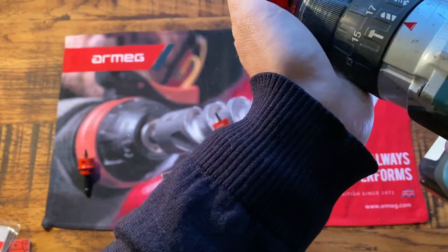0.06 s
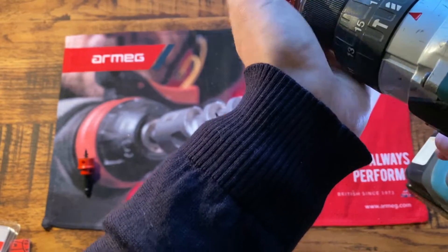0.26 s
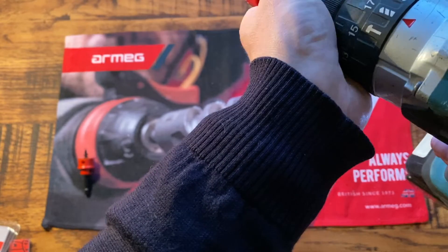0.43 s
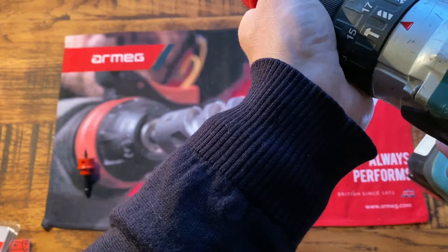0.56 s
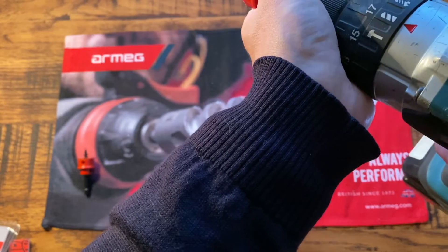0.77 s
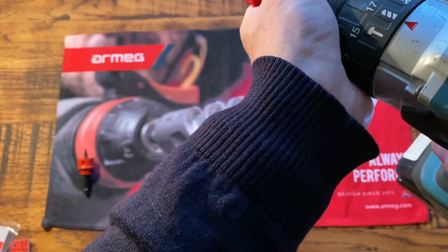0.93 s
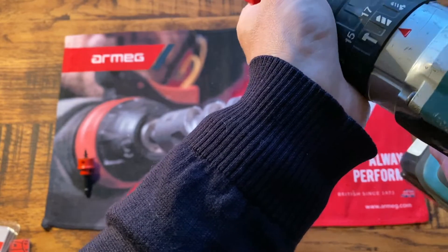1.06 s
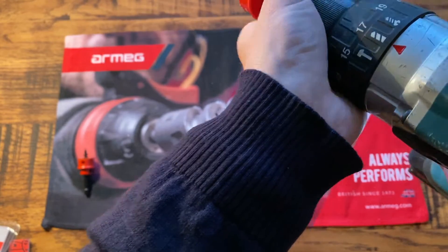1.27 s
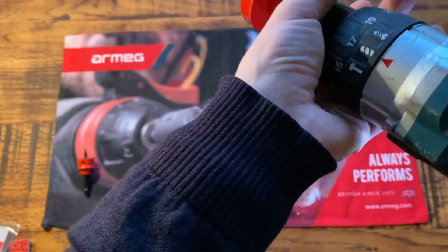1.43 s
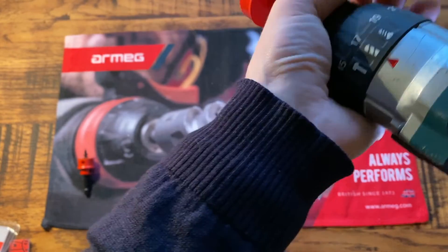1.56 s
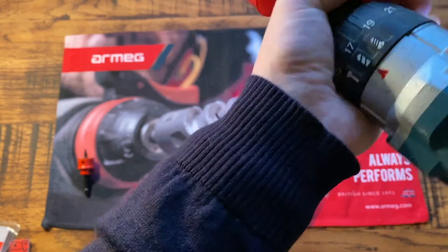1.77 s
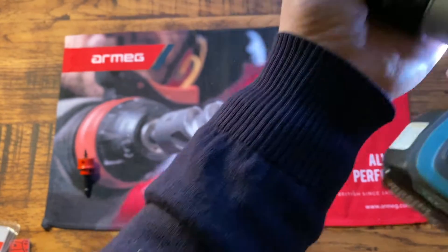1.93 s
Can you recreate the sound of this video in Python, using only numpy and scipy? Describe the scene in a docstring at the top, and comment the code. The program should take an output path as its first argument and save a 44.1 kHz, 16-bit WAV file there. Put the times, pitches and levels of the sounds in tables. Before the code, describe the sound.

A drill chuck is turned by hand, with clicks, brief whirrs and a sharp clack.

```python
"""A hand works the chuck of a cordless drill over a table in a small room, close to the microphone.
First, dull puffs of air buffet the microphone while the grip loosens and the chuck's lock ticks twice.
A short turn makes the gears whirr, sinking in pitch, and the plastic sleeve creaks. In a second turn
the chuck catches with a rattling double clack of steel jaws and housing. Last, the palm slides over
the sleeve with a soft rasp and one more tick."""
import sys
import numpy as np
from scipy import signal
from scipy.fft import rfft, irfft
from scipy.io import wavfile

SR = 44100
rng = np.random.default_rng(int(sys.argv[2]) if len(sys.argv) > 2 else 0)


def wrap_up_sound(samples):
    """Save the sound to the file named by the first command line argument, as 16-bit audio."""
    columns = np.atleast_2d(samples).T
    # keep every value between -1 and 1, then stretch to whole-number steps
    tamed = np.clip(columns, -1, 1)
    steps = np.round(tamed * 32767).astype(np.int16)
    wavfile.write(sys.argv[1], SR, steps)


N = 88200

# chuck hits: (time [s], steel tick [dB], body knock [dB], spot pitch [Hz], spot ring [dB])
CHUCK_HITS = [(0.3494, -8.5, -24.5, 7060, -15), (0.351, -15, -14, 804, -27), (0.375, -5, -17.5, 1900, -32),
              (0.377, -17.5, -29, 3640, -28), (0.882, -35.5, -39, 1940, -46.5),
              (0.9312, -24, -17, 2200, -33.5), (0.938, -20.5, -35, 7800, -44),
              (1.289, -39.5, -48, 1500, -43.5), (1.298, -57, -39.5, 1366, -51),
              (1.556, -29, -30, 2326, -45), (1.568, -34.5, -25, 1760, -36), (1.5866, -22, -36, 634, -33.5),
              (1.605, -42, -24, 434, -26), (1.634, -0.5, 1.5, 2600, -6), (1.636, -22, -2, 338.5, -30.5),
              (1.6385, -14, -2.5, 4240, -29), (1.6421, -7, -18, 8200, -2), (1.643, -5, -5, 1864, -6.5),
              (1.6459, -7, -21, 5350, -15), (1.6494, -20, -11, 3110, -9), (1.677, -15, -27, 2900, -21),
              (1.6931, -13.5, -39.5, 5000, -32), (1.9083, -17, -28, 4560, -21.5)]
# ring of the steel jaws and of the plastic sleeve and housing: (pitch [Hz], level [dB], t60 [s])
JAW_MODES = [(5950, -4, .02), (6700, -5, .012), (7150, -2, .011), (7850, -3, .012), (9850, -5, .01),
             (10450, -5, .01), (15150, -8, .015)]
HOUSING_MODES = [(905, -7.5, 0.025), (1747, -1, 0.082), (1911, -2, 0.065), (2196, -6.5, 0.05),
                 (2526, -1.5, .04), (2800, 0, .05), (3060, -3.5, .04), (3260, -5, .035), (4225, -3, .05),
                 (5124, -1.5, 0.062)]
# attack EQ of the bright tick and of the dull knock: (frequency [Hz], level [dB])
TICK_EQ = [(300, -19.5), (2000, -7.5), (4500, -10), (7000, 2.5), (8700, -2.5), (10300, 0), (13000, -11),
           (15500, -12.5)]
KNOCK_EQ = [(30, -53), (100, -27.5), (400, -5.5), (850, -4.5), (1250, -6), (1900, 2), (3000, -3),
            (4300, -2), (5800, -13), (10000, -30.5), (16000, -37.5)]
# chuck turns, one table each: (time [s], gear mesh rate [Hz], level [dB], extra gain on the tones [dB])
CHUCK_TURNS = [
    [(0.928, 409.3, -59.5, 13), (0.940, 402.6, -32.5, -13.5), (0.956, 385, -35.5, 7.5),
     (0.975, 375.5, -34, 7), (1.0, 352.2, -34.5, 2.5), (1.04, 346.7, -34.5, 0.5), (1.086, 333, -32.5, -4.5),
     (1.105, 325, -44, -17.5), (1.125, 312, -61, -11)],
    [(1.585, 559, -43, 7), (1.603, 530.5, -34.5, 4), (1.626, 480.7, -27.5, -2.5), (1.655, 443, -29, -12),
     (1.675, 414.9, -31, 4.5), (1.697, 391.2, -30.5, 5), (1.718, 352.4, -34.5, 1), (1.732, 346, -42, 5),
     (1.76, 340, -62.5, 13)],
]
# tones of the whirr: (multiple of the mesh rate [ratio], level [dB])
GEAR_PARTIALS = [(1, -14.5), (2.46, -19), (2.95, -33), (3.4, -26.5), (4.5, -24.5)]
# EQ of the grinding teeth: (frequency [Hz], level [dB])
GRIT_EQ = [(100, -29), (200, -9.5), (280, -15.5), (380, -8), (560, -2.5), (740, -5.5), (1050, 2.5),
           (1600, 0.5), (2600, -5), (4300, -6.5), (6500, -8.5), (8000, -9.5), (11500, -14), (13000, -18.5),
           (16000, -31)]
# creaks of the sleeve: (time [s], starting pitch [Hz], level [dB])
SLEEVE_CREAKS = [(0.313, 1274, -51.5), (0.534, 1380, -60.5), (0.847, 783, -59.5), (0.949, 1404, -41),
                 (0.975, 1980, -41), (1.207, 1460, -68), (1.565, 1236, -41.5), (1.713, 1422, -33),
                 (1.775, 1397, -51), (1.945, 1454, -51)]
# faders for skin sliding on the sleeve and for its treble shelf: (time [s], level [dB])
SLIDE_FADER = [(0, -55.5), (0.07, -57.5), (0.17, -61), (0.2, -63), (0.3, -66), (0.5, -68), (0.565, -66),
               (0.62, -75.5), (0.82, -87.5), (0.89, -68), (1.18, -82), (1.24, -83), (1.29, -61),
               (1.36, -63.5), (1.40, -85), (1.49, -93), (1.55, -67), (1.74, -50.5), (1.80, -50.5),
               (1.87, -45), (1.95, -46), (2.0, -55)]
TREBLE_FADER = [(0, -10.5), (0.25, -4.5), (0.55, 1), (0.9, -8), (1.32, 6.5), (1.6, 5.5)]
# EQ of the slide under a firm grip and under a light touch: (frequency [Hz], level [dB])
FIRM_EQ = [(150, -16), (370, -2.5), (600, -5), (950, -6.5), (1400, 1), (1900, -7.5), (4500, -16),
           (7000, -19), (11000, -22), (13000, -28), (16000, -33.5)]
LIGHT_EQ = [(200, -18), (700, -14), (1200, -1), (2000, 5), (2900, -4), (4500, 3.5), (7000, -3.5),
            (9000, -9.5), (11000, 0), (13500, -14), (16000, -21.5)]
# the grip loosens, then closes again: (time [s], firmness [0-1])
GRIP_FIRMNESS = [(0.07, 0.83), (0.17, 0), (1.45, 0), (1.55, 0.97)]
# puffs of air on the microphone: (time [s], level [dB], starting pitch [Hz])
AIR_PUFFS = [(0.113, -24, 338), (0.146, -19, 294), (0.188, -19, 324), (0.224, -25, 588),
             (0.256, -23.5, 425), (0.300, -23, 330), (0.331, -25.5, 168), (0.389, -27, 110),
             (0.41, -33.5, 445), (0.439, -28, 340), (0.471, -20, 471), (0.565, -30, 385),
             (0.58, -24.5, 163), (0.629, -35, 391), (0.712, -40.5, 306), (0.787, -46, 379)]
# fader for the eddies between the puffs: (time [s], level [dB])
EDDY_FADER = [(0, -57.5), (0.07, -50), (0.12, -30), (0.24, -25), (0.39, -33.5), (0.53, -40.5), (0.6, -43.5),
              (0.76, -53.5), (0.85, -61), (1.0, -79), (1.07, -59), (1.23, -64), (1.4, -85.5), (1.55, -75.5),
              (2.0, -74.5)]
# EQ of the rumbling eddies and of the room tone: (frequency [Hz], level [dB])
EDDY_EQ = [(15, -29), (35, -3), (62, 6), (100, 1.5), (160, -5.5), (280, -18.5), (450, -28), (800, -49.5),
           (2000, -99.5)]
ROOM_TONE_EQ = [(18, -35.5), (30, -4), (311, -4.5), (554, -9.5), (721, -12.5), (5590, -21), (11400, -24.5),
                (16000, -24.5)]
# decay of the room's tail: (frequency [Hz], t60 [s])
ROOM_DECAY = [(200, 0.28), (800, 0.17), (2000, 0.19), (6000, 0.2), (15000, 0.11)]

STEEL_LAG_S, BODY_LAG_S = .000181, .00003  # delay to the left microphone port
HIT_RISE_S, SPOT_T60_CYCLES = 0.00013, 13.4
GEAR_WOBBLE, TOOTH_DEPTH, GRIT_DB = 0.0156, 0.23, -2.5
CREAK_RISE_S, CREAK_JITTER, CREAK_ROUGH, CREAK_SAG_PER_S = 0.0021, 0.021, 0.82, 5.6
PUFF_RISE_S, PUFF_SAG_S, PUFF_END_HZ, PUFF_JITTER, PUFF_ROUGH = 0.01, 0.006906, 60, .18, .28
AIR_PHASE_RAD = 0.78  # the right port leads
EARLY_DB, EARLY_DECAY_S, TAIL_DB, TAIL_RISE_S = -4, 0.0045, -9, 0.0039
LEFT_DB, ROOM_TONE_DB = -2.2, -76.5


def chuck():
    """Each hit rings the steel jaws, knocks the housing and sounds the spot where it lands."""
    ticks, knocks = np.zeros((2, N))
    for s, tick_db, knock_db, spot_hz, spot_db in CHUCK_HITS:
        tick = strike(JAW_MODES, TICK_EQ, ring_db=-33, crack_s=0.0003, crack_db=-0.5)
        knock = strike(HOUSING_MODES, KNOCK_EQ, ring_db=-31, crack_s=0.00042, crack_db=-6.5)
        add(ticks, s, amp(tick_db) * tick)
        add(knocks, s, amp(knock_db) * knock + amp(spot_db) * struck_spot(spot_hz))
    return pan_right(ticks, STEEL_LAG_S) + pan_right(knocks, BODY_LAG_S)


def strike(modes, eq, ring_db, crack_s, crack_db):
    """One hit: a crack of noise for the attack, ringing modes for the tail."""
    t = np.arange(SR // 10) / SR
    attack = 1 - np.exp(-t / HIT_RISE_S)
    crack = colour(attack * np.exp(-t / crack_s) * rng.choice([-1., 1.], len(t)), eq)
    ring = sum(amp(db - 60 * t / t60) * np.sin(2 * np.pi * (hz * t + rng.random()))
               for hz, db, t60 in modes)
    return amp(crack_db) * crack + amp(ring_db) * ring * attack


def struck_spot(hz, gain_db=2):
    """The struck spot pings at its own pitch for a few cycles."""
    t = np.arange(SR // 10) / SR
    cycles = hz * t
    attack = 1 - np.exp(-cycles / .5)
    return attack * amp(gain_db - 60 * cycles / SPOT_T60_CYCLES) * np.sin(2 * np.pi * cycles)


def gears(turn):
    """Teeth grind in time with the mesh rate, under rough tones that sink as the turn slows."""
    t = np.arange(N) / SR
    mesh_hz, level_db, tones_db = (curve(turn, column) for column in (1, 2, 3))
    gate = (t > turn[0][0]) * (t < turn[-1][0])
    cycles = np.cumsum(mesh_hz * (1 + GEAR_WOBBLE * drift(62))) / SR
    tones = sum(amp(db) * gear_tone(multiple * cycles) for multiple, db in GEAR_PARTIALS)
    tooth_pulse = 1 + TOOTH_DEPTH * np.cos(2 * np.pi * cycles)
    grit = rubbing(per_s=8200, spread_db=4, eq=GRIT_EQ) * tooth_pulse
    return gate * amp(level_db) * (pan_right(amp(tones_db) * tones, BODY_LAG_S) + amp(GRIT_DB) * grit)


def gear_tone(cycles, fuzz=.25, fuzz_hz=35):
    """One unsteady partial of the whirr: part clean, part narrow noise around the same pitch."""
    carrier = np.exp(2j * np.pi * (cycles + rng.random()))
    noise = drift(fuzz_hz) + 1j * drift(fuzz_hz)
    return (carrier * (np.sqrt(2 * (1 - fuzz)) + np.sqrt(fuzz) * noise)).real


def creaks():
    """The plastic sleeve slips with a brief, rough, sinking chirp."""
    track, t = np.zeros(N), np.arange(SR // 20) / SR
    for s, start_hz, db in SLEEVE_CREAKS:
        hz = start_hz * np.exp(-CREAK_SAG_PER_S * t)
        cycles = np.cumsum(hz * (1 + CREAK_JITTER * drift(1500)[:len(t)])) / SR
        slips = 1 + CREAK_ROUGH * drift(500)[:len(t)]
        add(track, s, amp(db) * slips * swell(t, CREAK_RISE_S) * np.sin(2 * np.pi * cycles))
    return pan_right(track, BODY_LAG_S)


def palm(shelf_hz=7500, flicker_db=0.48):
    """Fine slips of skin on plastic, fuller as the grip firms."""
    firmness = np.clip(curve(GRIP_FIRMNESS), 0, 1)
    full, light = (rubbing(per_s=18000, spread_db=2.5, eq=eq) for eq in (FIRM_EQ, LIGHT_EQ))
    slips = np.sqrt(firmness) * full + np.sqrt(1 - firmness) * light
    treble = signal.sosfiltfilt(signal.butter(2, shelf_hz, "high", fs=SR, output="sos"), slips)
    level = amp(curve(SLIDE_FADER) + flicker_db * drift(70))
    return level * (slips + (amp(curve(TREBLE_FADER)) - 1) * treble)


def rubbing(per_s, spread_db, eq, width_db=2):
    """Friction grains from a wide contact: one layer shared by both ports, one more for each alone."""
    shared, left, right = (colour(grains(per_s, spread_db), eq) for _ in range(3))
    return unit(pan_right(shared, BODY_LAG_S) + amp(width_db) * np.array([left, right]))


def grains(per_s, spread_db):
    """Tiny random impacts of uneven size."""
    size = amp(spread_db * np.minimum(rng.exponential(1, N), 4))
    return unit(size * rng.choice([-1., 1.], N) * (rng.random(N) < per_s / SR))


def air(gust_db=2.6, puff_band_hz=(35, 527)):
    """Dull puffs thump the microphone, each fluttering as it sinks in pitch, over rumbling eddies."""
    eddy_level = amp(curve(EDDY_FADER) + gust_db * drift(45))
    eddies = eddy_level * unit(colour(rng.standard_normal(N), EDDY_EQ))
    puffs, t = np.zeros(N), np.arange(SR // 8) / SR
    for s, db, start_hz in AIR_PUFFS:
        hz = PUFF_END_HZ + (start_hz - PUFF_END_HZ) * np.exp(-t / PUFF_SAG_S)
        cycles = np.cumsum(hz * (1 + PUFF_JITTER * drift(160)[:len(t)])) / SR
        flutter = 1 + PUFF_ROUGH * drift(100)[:len(t)]
        add(puffs, s, amp(db) * flutter * swell(t, PUFF_RISE_S) * np.sin(2 * np.pi * cycles))
    puffs = signal.sosfilt(signal.butter(2, puff_band_hz, "band", fs=SR, output="sos"), puffs)
    port_phase = np.exp(.5j * AIR_PHASE_RAD * np.array([[-1], [1]]))
    return (signal.hilbert(eddies + puffs) * port_phase).real


def room(x):
    """Table and hand scatter the sound, then the room rings briefly; the left side is trimmed down."""
    t = np.arange(SR // 2) / SR
    early, tail = rng.standard_normal((2, 2, len(t))) * (rng.random((2, 2, len(t))) < .15)
    early = early * np.exp(-t / EARLY_DECAY_S) * (t > .0007)  # short pre-delay
    hz, age_s, bands = signal.stft(tail * np.minimum(t / TAIL_RISE_S, 1), SR, nperseg=256)
    decay = amp(-60 * age_s / at_frequency(ROOM_DECAY, hz)[:, None])
    tail = signal.istft(bands * decay, SR, nperseg=256)[1][:, :len(t)]
    reverb = sum(amp(db) * part / np.linalg.norm(part, axis=1, keepdims=True)
                 for db, part in [(EARLY_DB, early), (TAIL_DB, tail)])
    return (x + signal.fftconvolve(x, reverb, axes=1)[:, :N]) * amp([[LEFT_DB], [0]])


def room_tone():
    """A faint bed of dark noise, separate on each side."""
    return amp(ROOM_TONE_DB) * np.array([colour(side, ROOM_TONE_EQ) for side in rng.standard_normal((2, N))])


def pan_right(x, lag_s):
    """The drill sits to the right: its sound reaches the left port later."""
    delay = np.exp(-2j * np.pi * np.fft.rfftfreq(N, 1 / SR) * lag_s)
    return np.array([irfft(rfft(x) * delay, N), x])


def colour(x, eq, size=8192):
    """Minimum-phase EQ of unit energy."""
    log_gain = np.log(amp(at_frequency(eq, abs(np.fft.fftfreq(size, 1 / SR)))))
    taps = np.fft.ifft(np.exp(np.conj(signal.hilbert(log_gain)))).real[:size // 2]
    return signal.fftconvolve(x, taps / np.linalg.norm(taps))[:len(x)]


def drift(rate_hz):
    """Random modulation of rms 1, rolled off above the rate."""
    rolloff = 1 + (np.fft.rfftfreq(N, 1 / SR) / rate_hz) ** 4
    return unit(irfft(rfft(rng.standard_normal(N)) / rolloff, N))


def swell(t, rise_s):
    """Envelope that rises to 1, then dies away."""
    return t / rise_s * np.exp(1 - t / rise_s)


def curve(rows, column=1):
    """Automation: one column of a time table at every sample."""
    rows = np.array(rows)
    return np.interp(np.arange(N) / SR, rows[:, 0], rows[:, column])


def at_frequency(points, hz):
    """Reads a table on a log-frequency axis."""
    point_hz, value = np.transpose(points)
    return np.interp(np.log(hz + 1), np.log(point_hz), value)


def add(mix, s, sound):
    """Mixes a sound in at a time."""
    part = mix[round(s * SR):][:len(sound)]
    part += sound[:len(part)]


def amp(db):
    """Decibels to gain."""
    return 10 ** (np.asarray(db) / 20)


def unit(x):
    """Scales to rms 1."""
    return x / np.sqrt(np.mean(x ** 2) + 1e-20)


def scene():
    """The drill in its room, dry air on the microphone and a bed of room tone."""
    bed = room_tone()
    drill = chuck() + creaks() + sum(gears(turn) for turn in CHUCK_TURNS) + palm()
    return room(drill) + air() + bed


def record(dry):
    """A soft clip rounds the loudest peaks; a steep low-pass takes off the very top."""
    ceiling, cutoff_hz = .85, 16500
    rounded = dry / (1 + (dry / ceiling) ** 4) ** .25
    lowpass = signal.firwin(255, cutoff_hz, window=("kaiser", 9), fs=SR)
    return signal.oaconvolve(rounded, lowpass[None], "same")


dry = scene()
out = record(dry)
wrap_up_sound(out)
```